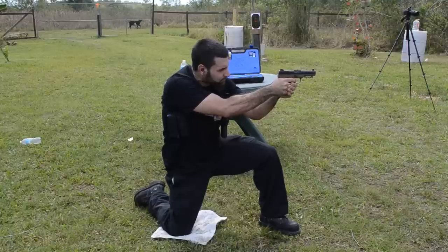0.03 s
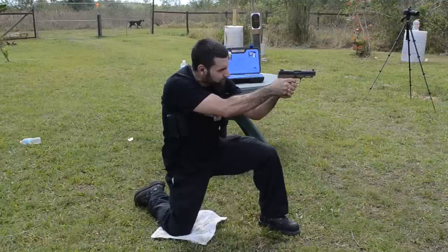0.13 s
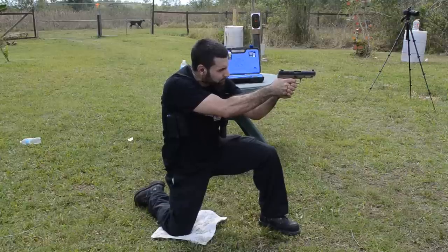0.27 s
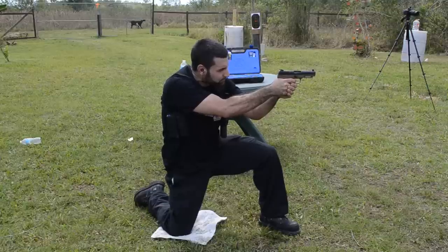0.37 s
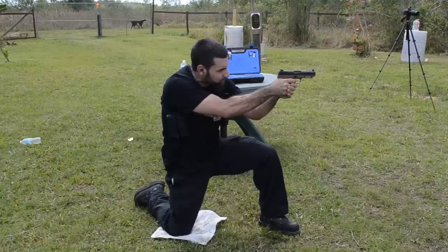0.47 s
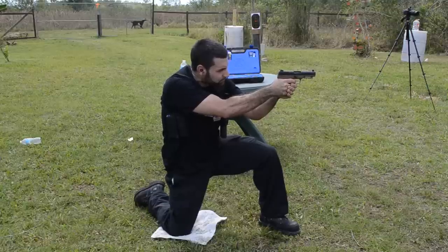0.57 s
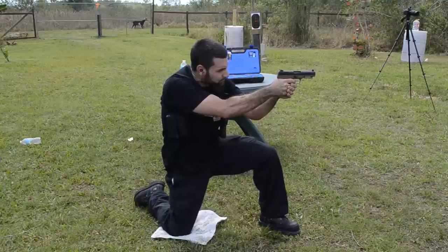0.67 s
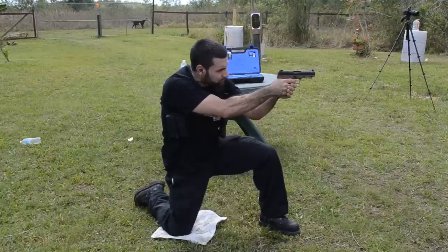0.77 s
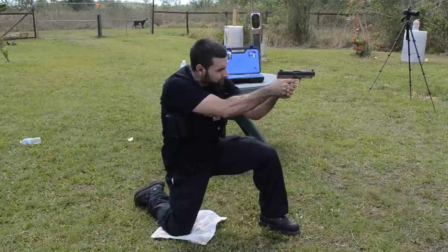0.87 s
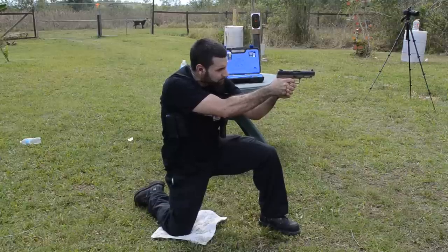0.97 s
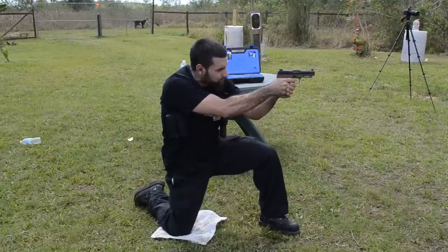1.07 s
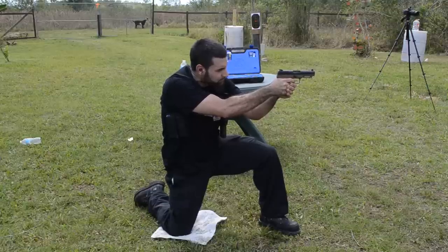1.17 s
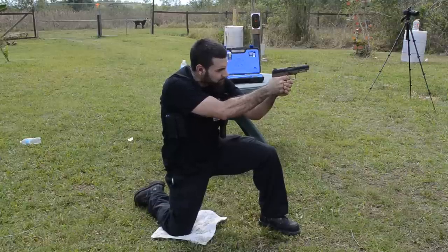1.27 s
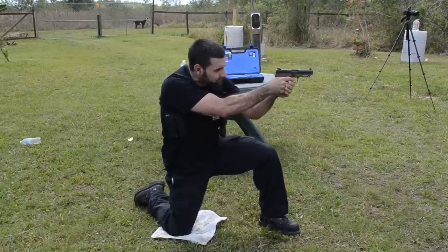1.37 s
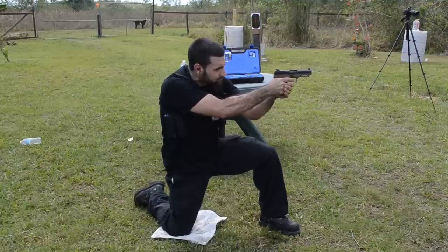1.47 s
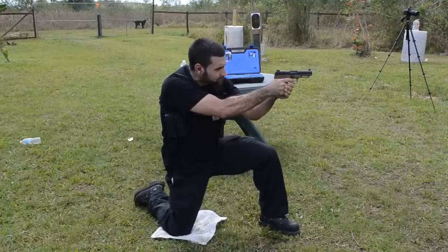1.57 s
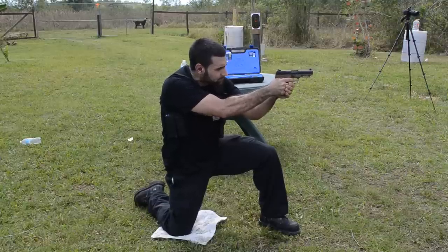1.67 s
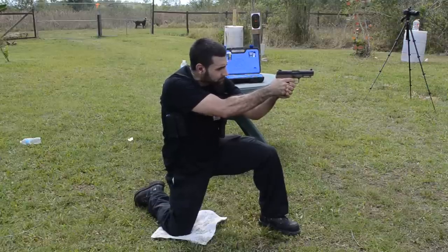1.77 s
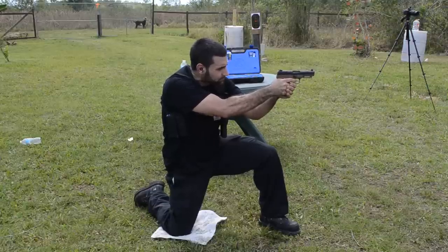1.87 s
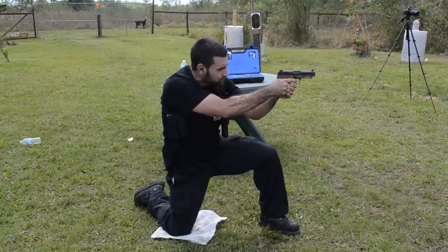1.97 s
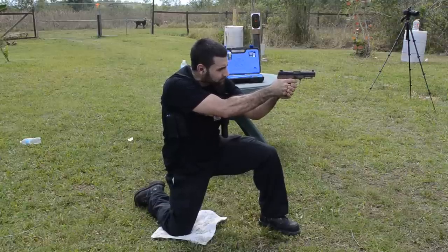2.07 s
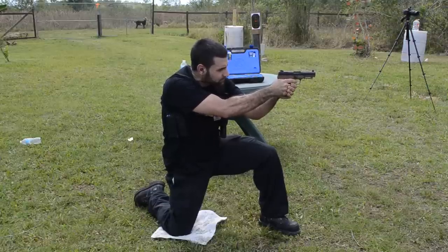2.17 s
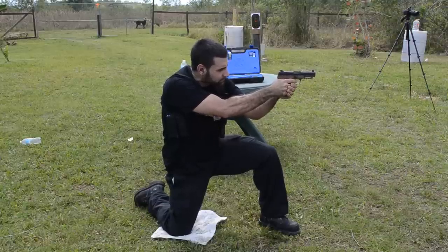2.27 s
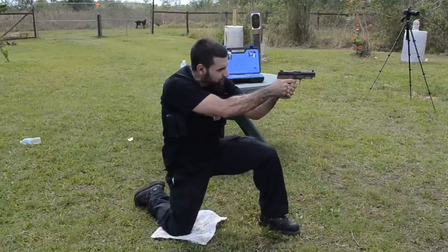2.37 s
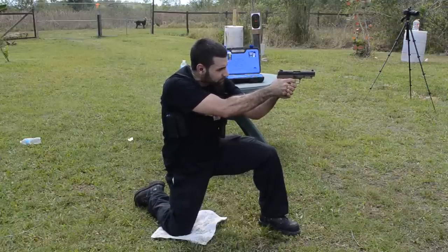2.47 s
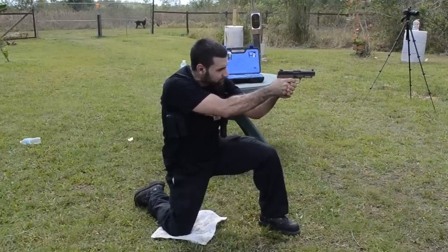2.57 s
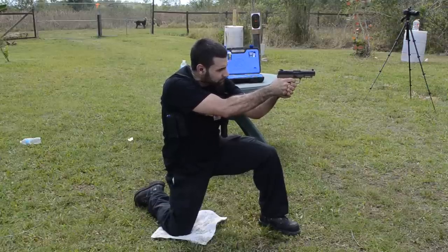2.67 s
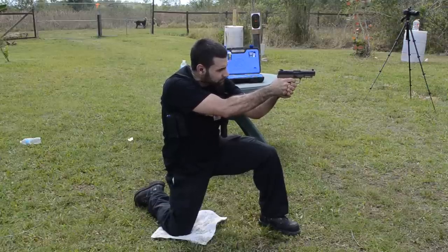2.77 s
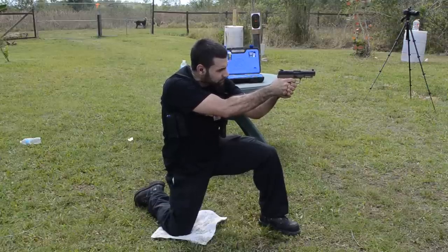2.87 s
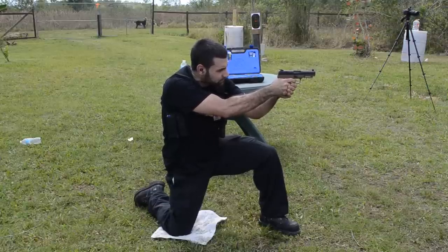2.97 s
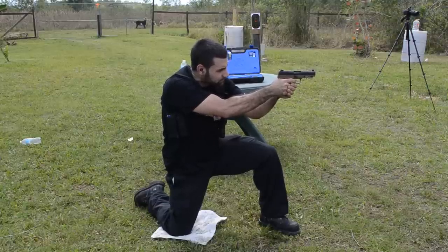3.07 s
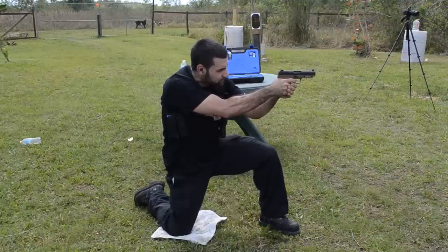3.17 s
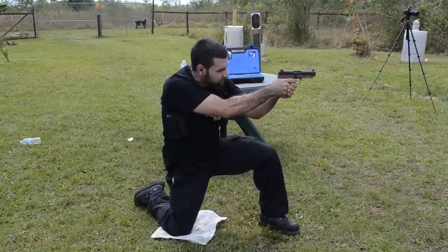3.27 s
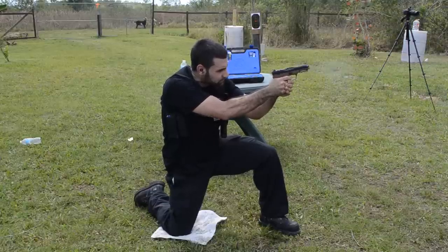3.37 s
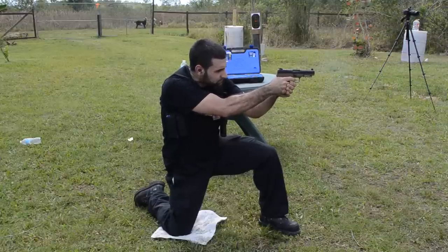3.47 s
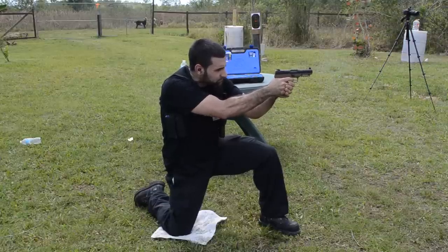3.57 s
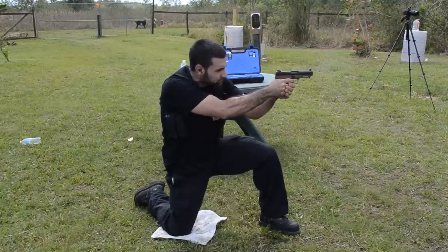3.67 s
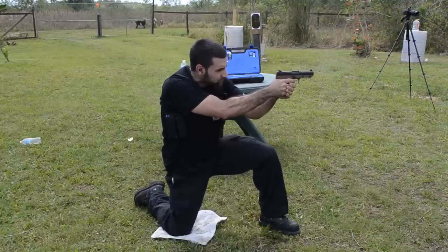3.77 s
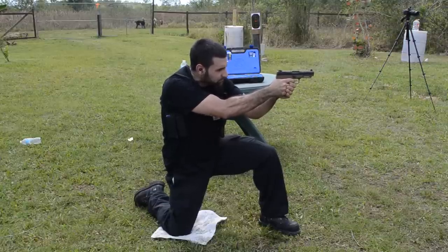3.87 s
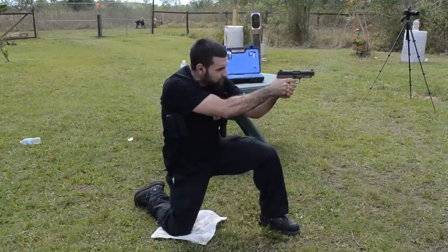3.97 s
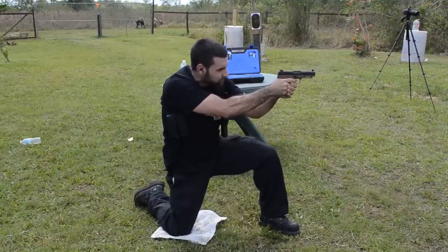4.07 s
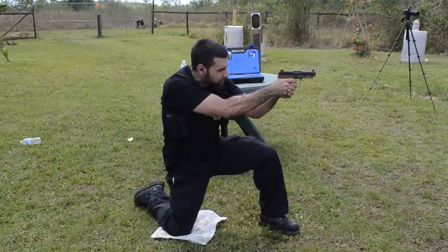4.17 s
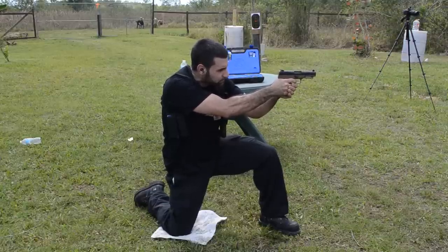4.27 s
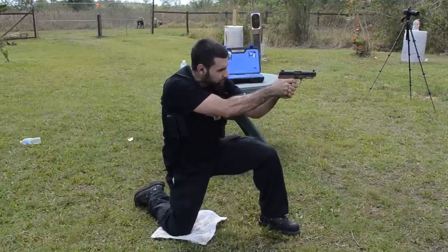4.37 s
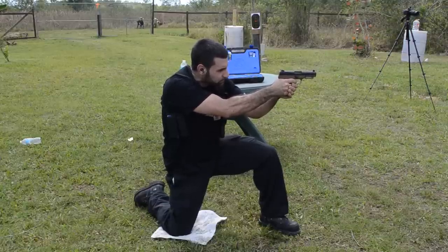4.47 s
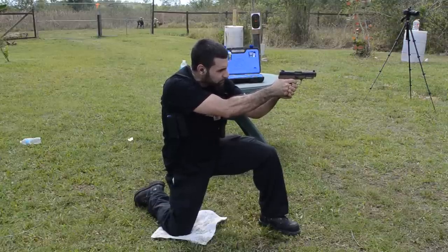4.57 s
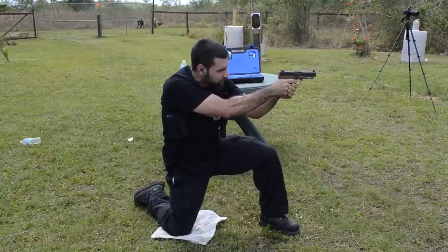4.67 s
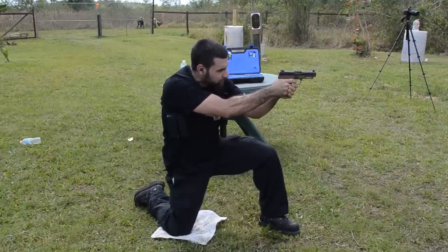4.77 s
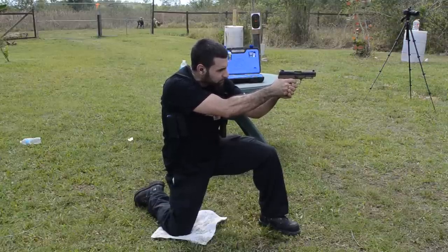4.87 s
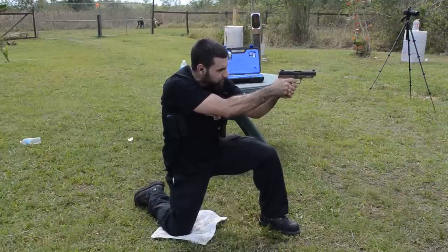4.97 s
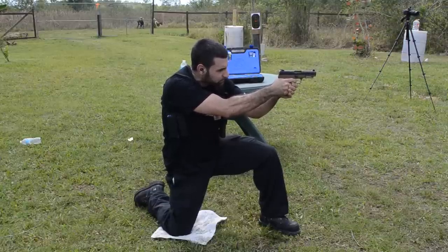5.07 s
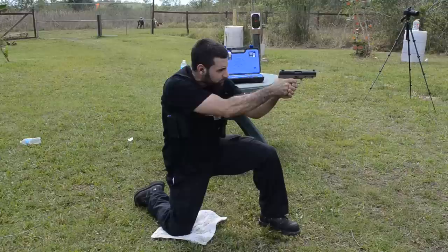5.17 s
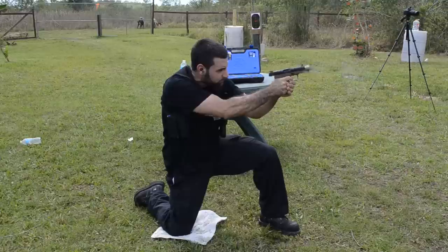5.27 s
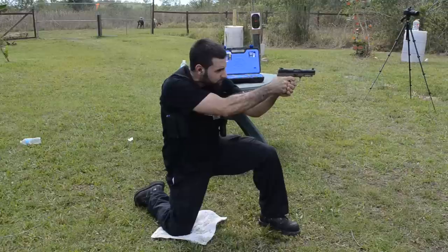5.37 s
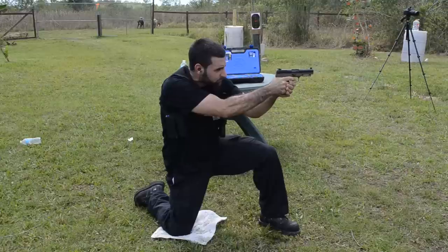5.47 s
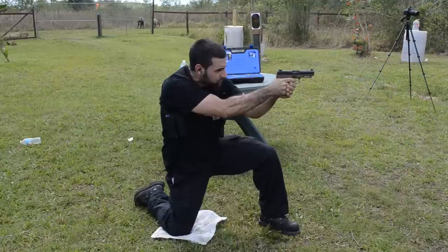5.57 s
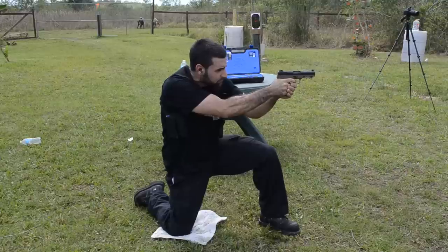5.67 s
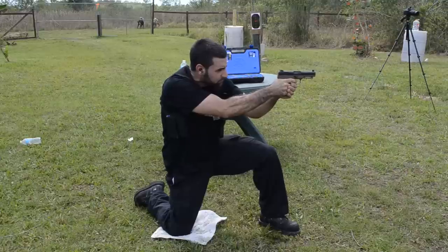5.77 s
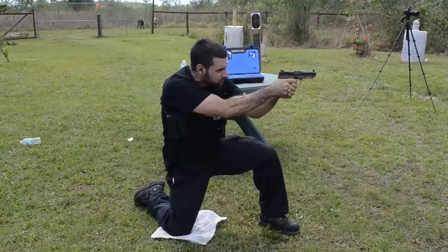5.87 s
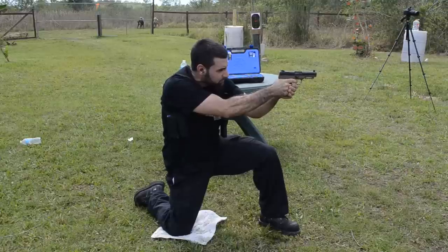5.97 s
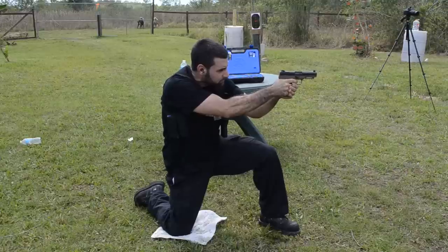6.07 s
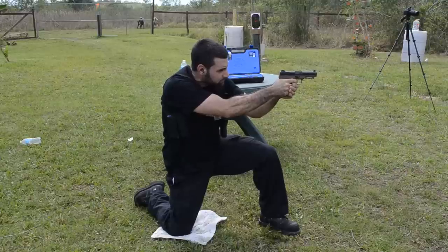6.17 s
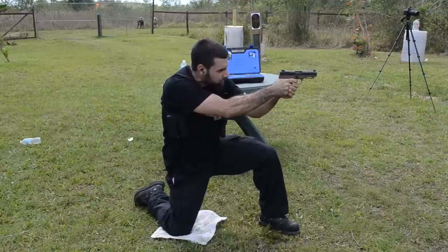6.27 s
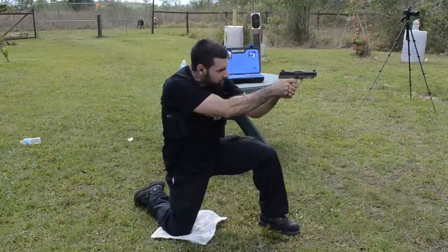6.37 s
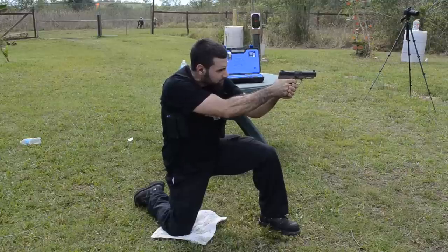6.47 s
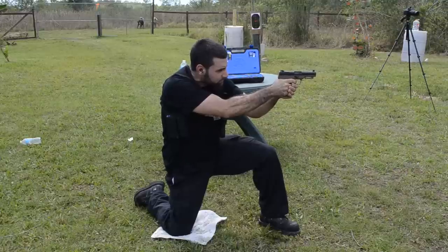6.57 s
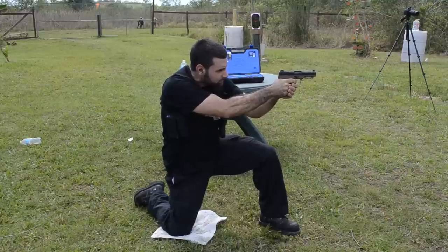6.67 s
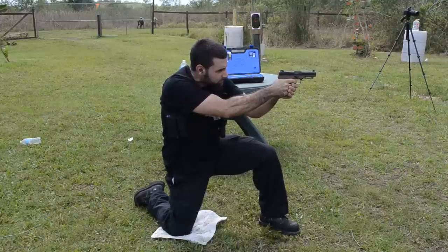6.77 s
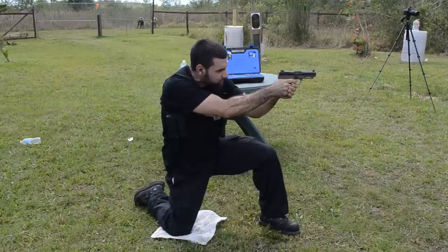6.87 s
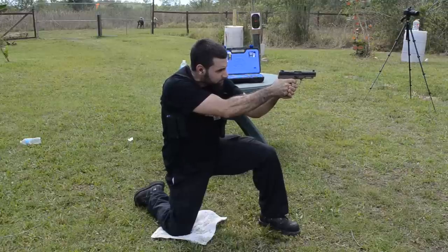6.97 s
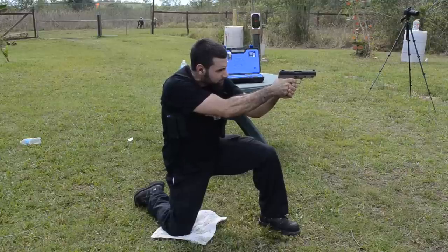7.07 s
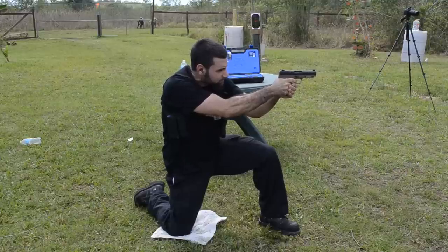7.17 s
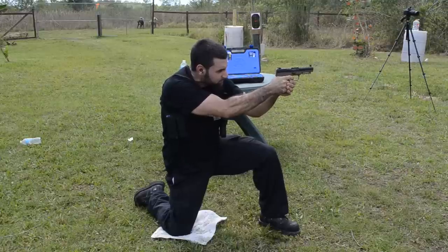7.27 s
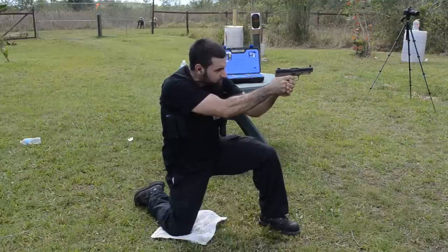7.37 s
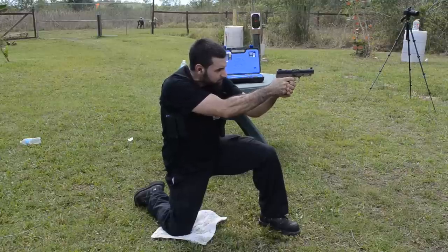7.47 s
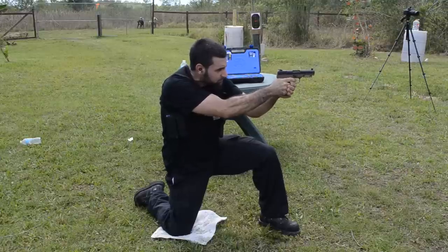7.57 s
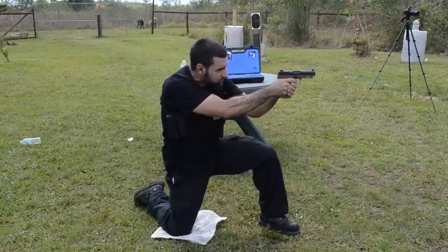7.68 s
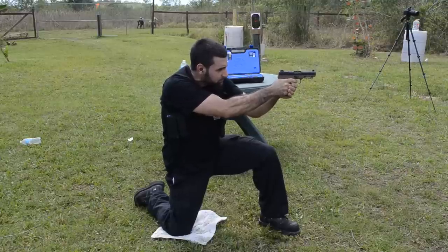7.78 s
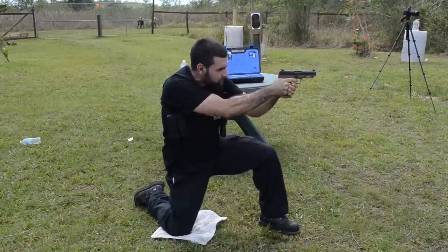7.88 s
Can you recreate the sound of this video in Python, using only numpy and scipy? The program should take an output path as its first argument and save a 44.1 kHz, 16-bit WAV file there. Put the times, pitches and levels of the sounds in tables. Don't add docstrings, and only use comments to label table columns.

```python
import sys
import numpy as np
from scipy import signal
from scipy.fft import rfft, irfft
from scipy.io import wavfile

SR = 44100
rng = np.random.default_rng(int(sys.argv[2]) if len(sys.argv) > 2 else 0)


def transcribe(u):
    v = np.clip(np.atleast_2d(u).T, -1, 1)
    q = np.round(v * 32767).astype(np.int16)
    wavfile.write(sys.argv[1], SR, q)


def invert_db(level):
    return 10 ** (np.asarray(level, dtype=float) / 20)


N = 350154


def filtered(x, hz, kind, order=2):
    return signal.sosfilt(signal.butter(order, hz, kind, fs=SR, output="sos"), x)


def rms_one(x):
    return x / np.sqrt(np.mean(x ** 2) + 1e-20)


def noise_band(low_hz, high_hz, size, order=2):
    return rms_one(filtered(rng.standard_normal(size), [low_hz, high_hz], "band", order))


def log_axis(size):
    return np.log(np.fft.rfftfreq(size, 1 / SR) + 1)


def coloured(x, points):
    hz, db = np.transpose(points)
    gain = invert_db(np.interp(log_axis(len(x)), np.log(hz), db))
    return irfft(rfft(x) * gain, len(x))


def drift(rate_hz, size):
    return rms_one(filtered(rng.standard_normal(size + SR), rate_hz, "low")[SR:])


def place(out_size, events, cycles, start=0.):
    out = np.zeros(out_size + SR)
    for s, db, hz in events:
        phase = np.arange(int(6 * cycles * SR / hz)) * hz / SR
        rise = phase / cycles * 2
        shape = rise * np.exp(1 - rise)
        at = int((s - start) * SR)
        out[at:at + len(phase)] += invert_db(db) * shape * np.sin(2 * np.pi * phase)
    return out[:out_size]


def blast(push_db, ring_hz):
    t = np.arange(int(.04 * SR)) / SR
    angle = 2 * np.pi * ring_hz * t * (1.25 - 300 * t)
    front = -invert_db(32) * np.sin(angle) * np.exp(-t / .00031)

    crowd_shape = .7 / (1 + (t / .006) ** 6) + .3 * np.exp(-t / .012)
    crowd = .9 * np.tanh(.75 * noise_band(600, 2100, len(t))) * crowd_shape

    wall = invert_db(-29) * np.exp(-((t - .0143) / .0008) ** 2)
    sizzle_shape = invert_db(-25.5) * np.exp(-t / .0052) + invert_db(-35.5) * np.exp(-t / .025) + wall
    sizzle = sizzle_shape * noise_band(2800, 11000, len(t), order=1)

    push = invert_db(push_db) * np.sin(np.pi * t / t[-1]) ** 2 * np.exp(-t / .011)
    return front + crowd + push + sizzle


# [t/s after the shot, level/dB in the mid band]
SCATTER_LEVEL = [(.006, -9.5), (.017, -19), (.045, -25.5), (.13, -14.5), (.25, -15.5), (.92, -45),
                 (1.03, -44.5), (1.4, -54), (2.07, -71.5)]


def posts(count):
    over_db, spread_db = 4, 3
    draw = rng.random((count, 3))
    s = .1 + 1.5 * (np.arange(count) + draw[:, 0]) / count
    db = np.interp(s, *np.transpose(SCATTER_LEVEL)) + over_db + spread_db * (2 * draw[:, 1] - 1)
    hz = np.interp(draw[:, 2], (0, 1), (750, 1600))
    return zip(s, db, hz)


# [t/s, peak level/dB, f/Hz]
NEAR = [(1.3392, -8, 800), (1.3425, -11, 1300), (1.3462, -6, 900), (1.3481, 1.5, 740), (1.3483, -8, 2100),
        (1.3515, -13, 450), (1.3664, -6.5, 1030), (1.3683, -10, 1030), (1.3810, -13, 1050)]
FAR = [(1.39, -13.5, 1500), (1.399, -7, 960), (1.433, -10, 980), (1.455, -6, 945), (1.462, -8, 930),
       (1.502, -10.5, 985), (1.518, -1.5, 1145), (1.56, -0.5, 940), (1.586, -22, 1390), (1.621, -7, 1010),
       (1.652, -7, 1096), (1.684, -6.5, 1030), (1.73, -18, 760), (1.742, -8, 1217), (1.789, -15, 987),
       (1.898, -16.5, 960), (2.018, -24, 1000), (2.053, -26, 1120), (2.129, -29.5, 1230),
       (2.205, -28.5, 970), (2.331, -37, 1100), (2.361, -33, 886), (2.394, -26.5, 930), (2.453, -38, 870),
       (2.522, -32, 875)]
THUMPS = [(1.3476, -9.5, 251), (1.471, -12.5, 248), (1.509, -10.5, 264), (1.566, -17, 215),
          (1.62, -24.5, 159), (1.656, -24.5, 140.6), (1.7, -27.5, 200), (1.77, -24, 190)]


def reflectors(size, first_s):
    near = invert_db(.5) * place(size, NEAR, 1.3, first_s)
    far = invert_db(-3.5) * place(size, FAR, 1.8, first_s)
    thumps = invert_db(-1) * place(size, THUMPS, .93, first_s)
    return near + far + thumps + place(size, posts(count=36), 1.7)


# [f/Hz, level/dB per Hz]
RETURN = [(50, -51.5), (85, -28), (117, -8.5), (208, -4), (527, -5.5), (653, 0), (1160, 1), (1700, -7),
          (3000, -15), (5080, -30), (8000, -38.5), (16000, -55.5)]
SCATTER_HZ = (125, 260, 1000, 4000)
# [level/dB, extra loss in dB/s, close-ground lift/dB, late swell/dB]
SCATTER_BANDS = [
    (-23.5, -1, 7, 13),
    (-11.5, 14, 5, 3),
    (-1.5, -1, -0.5, 1),
    (-8.5, 22.5, 1, 0.5),
]


def scatter(size, lumpy_db):
    t = np.arange(size) / SR
    level_db = np.interp(t, *np.transpose(SCATTER_LEVEL), left=-120, right=-120)
    close = np.exp(-t / .09)
    swell = np.exp(-((t - .42) / .15) ** 2)
    loss_s = np.minimum(t, .83)
    grains = rng.standard_normal(size) * invert_db(lumpy_db * drift(100, size))
    spectrum = rfft(coloured(grains, RETURN))
    out = 0
    for share, (db, loss, close_db, swell_db) in zip(np.eye(4), SCATTER_BANDS):
        band = irfft(spectrum * np.interp(log_axis(size), np.log(SCATTER_HZ), share), size)
        band_db = level_db + db - loss * loss_s + close_db * close + swell_db * swell
        out = out + rms_one(band) * invert_db(band_db)
    return out * (1 - .55 * np.exp(-(t / .035) ** 2))


# [t/s, echo trim level/dB, low push level/dB, port ring f/Hz]
SHOTS = [
    (1.3339, 0.5, -37, 1748),
    (3.4479, -0.5, -35, 1500),
    (5.3663, 0, -18.5, 1738),
    (7.3128, 0.5, -20, 1367),
]


def shots():
    size, alike = int(2.2 * SR), .88
    ceiling = .75
    discrete = reflectors(size, SHOTS[0][0])
    shared = scatter(size, lumpy_db=1)
    late = np.arange(size) > .025 * SR
    out = np.zeros(N + size)
    for s, trim_db, push_db, ring_hz in SHOTS:
        diffuse = alike * shared + np.sqrt(1 - alike ** 2) * scatter(size, lumpy_db=.5)
        wobble = invert_db(1.2 * drift(30, size))
        echo = invert_db(trim_db) * (invert_db(-1) * diffuse + discrete * wobble)
        echo = np.where(late, ceiling * np.tanh(echo / ceiling), echo)
        at, front = int(s * SR), blast(push_db, ring_hz)
        out[at:at + size] += filtered(echo, 95, "high", order=4)
        out[at:at + len(front)] += front
    return out[:N]


def ducking():
    t = np.arange(N) / SR
    duck_db, recover_s = 31, .094
    loss_db = 0
    for s, *_ in SHOTS:
        loss_db = loss_db + duck_db * np.exp(-np.maximum(t - s, 0) / recover_s) * (t >= s)
    return invert_db(-loss_db)


# [t/s, half length/s, level/dB]
GUSTS = [(0.01, 0.032, -64), (.37, 0.057, -61), (1.19, 0.017, -51), (1.7, 0.5, -61.5), (2.136, 0.046, -49),
         (2.46, 0.17, -68), (3.7, 0.35, -65.5), (4.72, 0.094, -65), (5.3, .05, -64.5), (5.55, .2, -60),
         (6.22, 0.094, -55), (6.66, .05, -74), (7.24, .05, -70), (7.55, 0.24, -63)]


def wind(t):
    level = invert_db(-68.5 + 3.5 * drift(5, N))
    for s, half_s, db in GUSTS:
        level = level + invert_db(db) * np.exp(-((t - s) / half_s) ** 2)
    return level * noise_band(22, 75, N)


# [t/s, length/s, level/dB, brightness f/Hz]
RUSTLES = [(.11, 0.045, -60, 1500), (.29, .07, -75, 7000), (.45, 0.03, -64, 1500),
           (0.646, 0.11, -56.5, 1210), (0.685, .05, -73, 7000), (0.973, .035, -64, 2400),
           (1.25, .035, -73, 7000), (2.888, .04, -62, 1800), (3.05, .08, -76, 6000)]


def rustles(t):
    crackle = rng.standard_normal(N) * invert_db(2.6 * drift(200, N))
    out = 0
    for s, length_s, db, hz in RUSTLES:
        stroke = np.exp(-((t - s) / length_s * 2) ** 2)
        out = out + invert_db(db) * stroke * rms_one(filtered(crackle, [hz / 5, hz * 1.46], "band"))
    return out


# [t/s, peak level/dB, f/Hz]
CLICKS = [(0.102, -52, 1050), (0.286, -52, 1210), (0.57, -47, 1600), (0.628, -43, 600), (0.661, -47, 1740),
          (0.717, -45, 689), (0.812, -56, 1230), (1.246, -49, 1350)]


def handling():
    return invert_db(5.5) * place(N, CLICKS, .34)


# [t/s, lower insect level/dB, upper insect level/dB]
INSECTS = [(0, -74, -83), (1.3, -74, -83), (2.6, -84, -80.5), (7.94, -86, -79.5)]


def insects(t):
    s, *levels = np.transpose(INSECTS)
    out = 0
    for hz, half_hz, db in zip((3160, 3447), (50, 30), levels):
        trill = noise_band(hz - half_hz, hz + half_hz, N)
        out = out + invert_db(np.interp(t, s, db) + 1.2 * drift(8, N)) * trill
    return out


# [t/s, chirps so far]
CRICKET = [(.11, 0), (1.13, 6), (2.41, 13), (3.29, 18), (6.89, 39), (7.92, 45)]


def cricket(t):
    hz, half_hz = 5650, 280
    beat = np.cos(2 * np.pi * np.interp(t, *np.transpose(CRICKET)))
    chirp = np.maximum(beat - .55, 0) / .45
    return invert_db(-86) * chirp * noise_band(hz - half_hz, hz + half_hz, N)


def hum(t):
    hz, db = 95, -62.5
    tone = np.sin(2 * np.pi * np.cumsum(hz + 3 * drift(1.5, N)) / SR)
    return invert_db(db) * noise_band(hz - 14, hz + 14, N) + invert_db(db - 4) * tone


# [f/Hz, level/dB]
HUSH = [(79, -35), (135, 1), (212, -5), (969, -2), (2010, -9.5), (2860, -14.5), (3100, -15), (4970, -28),
        (12100, -34.5), (13300, -52.5), (15000, -61)]


def hush():
    level = invert_db(-59.5 + .55 * drift(6, N))
    return level * rms_one(coloured(rng.standard_normal(N), HUSH))


def background():
    t = np.arange(N) / SR
    movements = rustles(t) + handling()
    return wind(t) + movements + insects(t) + cricket(t) + hum(t) + hush()


def scene():
    mono = shots() + ducking() * background()
    return np.stack([mono, mono])


def treble_gaps(x):
    from_hz, step_hz, threshold_db = 3500, 610, -42
    hz, _, frames = signal.stft(x, SR, "cosine", nperseg=2048, boundary="even")
    power = 1e-20 + abs(frames[0] + frames[1]) ** 2
    band = (np.maximum(hz - from_hz + step_hz, 0) // step_hz).astype(int)
    per_band = np.stack([power[band == k].sum(axis=0) for k in range(band.max() + 1)])
    threshold = invert_db(threshold_db + 1.5 * rng.standard_normal(frames.shape[2])) ** 2
    keep = per_band > threshold * power.sum(axis=0)
    return signal.istft(frames * keep[band], SR, "cosine", nperseg=2048)[1][:, :N]


def top_cut(x):
    return signal.sosfilt(signal.butter(12, 17270, fs=SR, output="sos"), x)


def record(dry):
    low_pass = signal.cheby2(8, 50, 17800, fs=SR, output="sos")
    x = signal.sosfilt(low_pass, np.clip(dry, -1, 1))

    apart = invert_db(-16) * filtered(np.roll(x[0], 300), [2900, 7500], "band", order=3)
    apart = apart + invert_db(-34) * filtered(np.roll(x[0], 700), 8000, "high")
    apart = apart + invert_db(-28) * filtered(x[0], 60, "low")
    whine = invert_db(-71) * np.sin(2 * np.pi * 15698 * np.arange(N) / SR)
    tracks = x + apart * [[1], [-1]] + whine

    extended = np.pad(tracks, ((0, 0), (0, 4096)), "reflect", reflect_type="odd")
    ending = np.minimum(np.arange(N)[::-1] / 150, 1)
    return top_cut(ending * np.clip(treble_gaps(extended), -1, 1))


dry = scene()
out = record(dry)
transcribe(out)
```